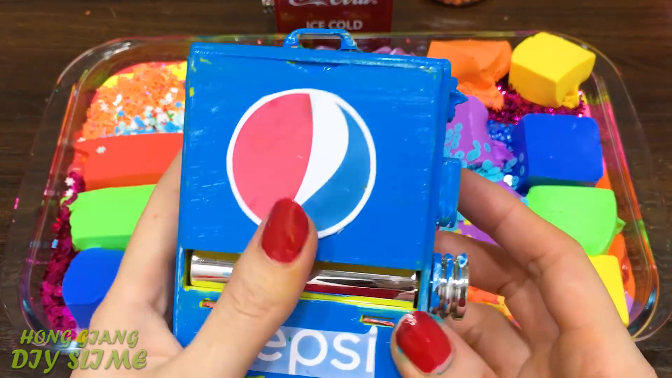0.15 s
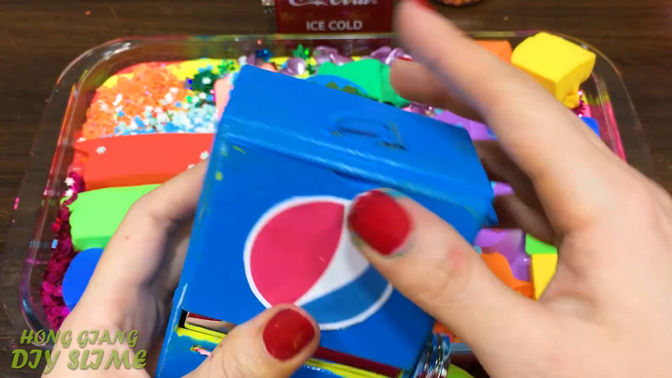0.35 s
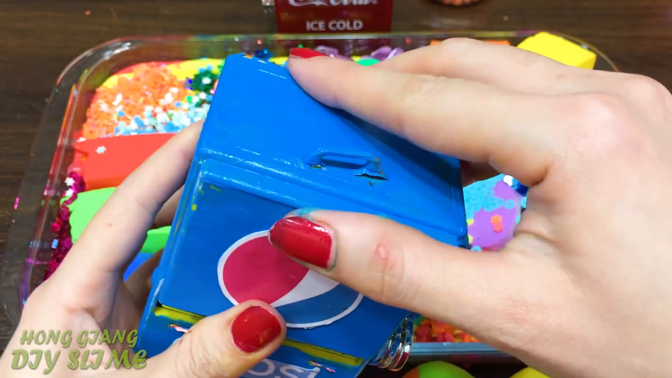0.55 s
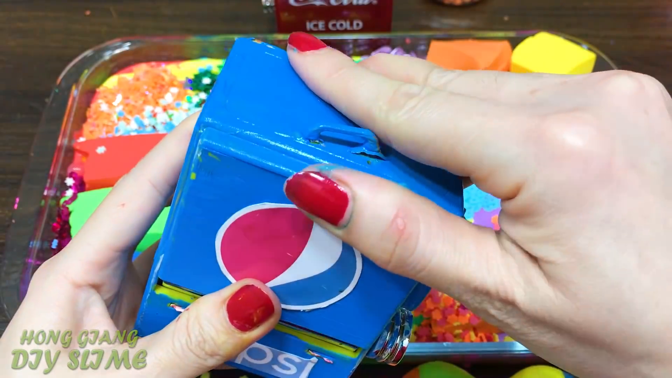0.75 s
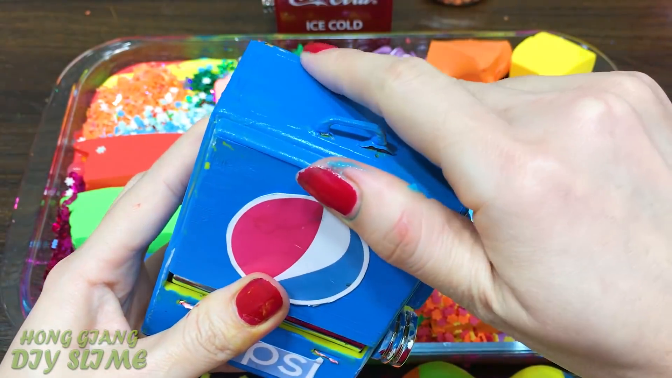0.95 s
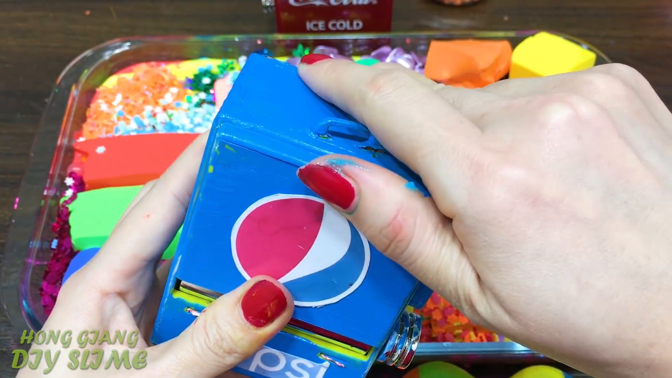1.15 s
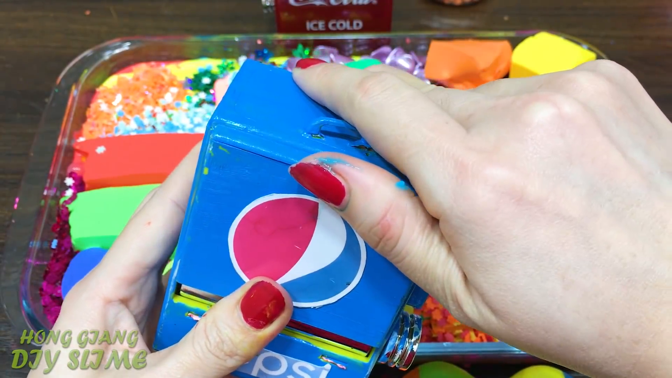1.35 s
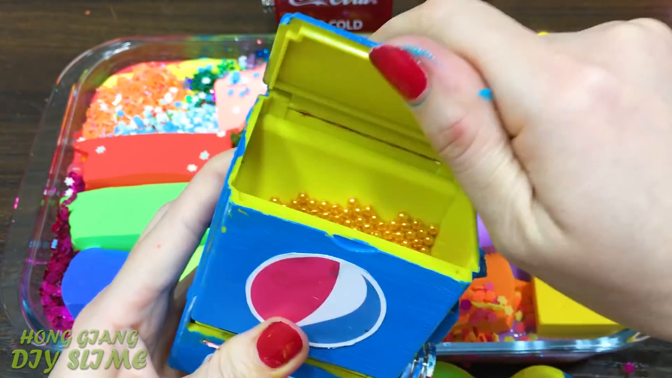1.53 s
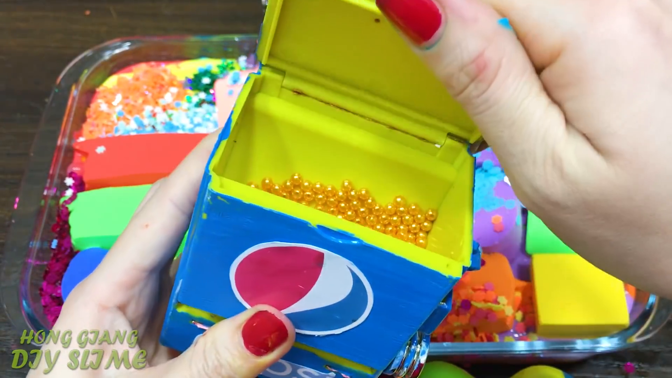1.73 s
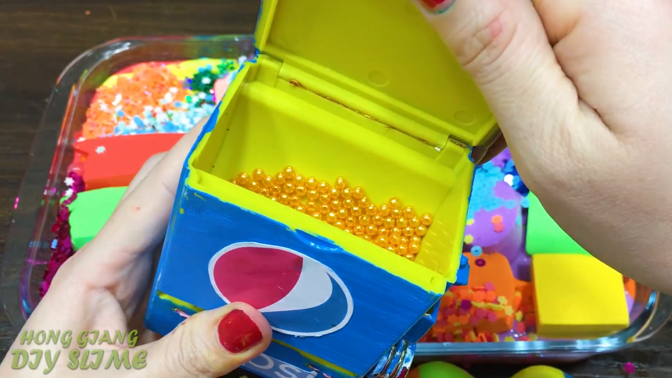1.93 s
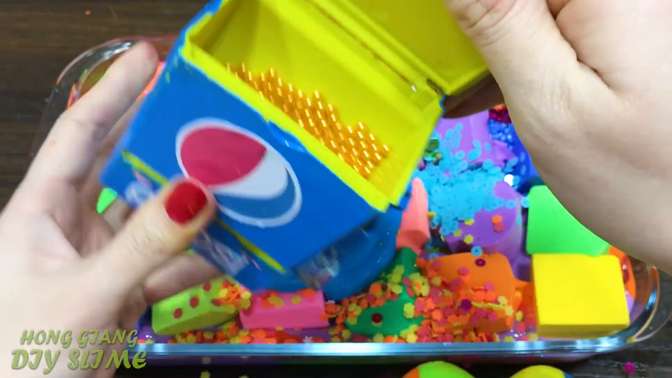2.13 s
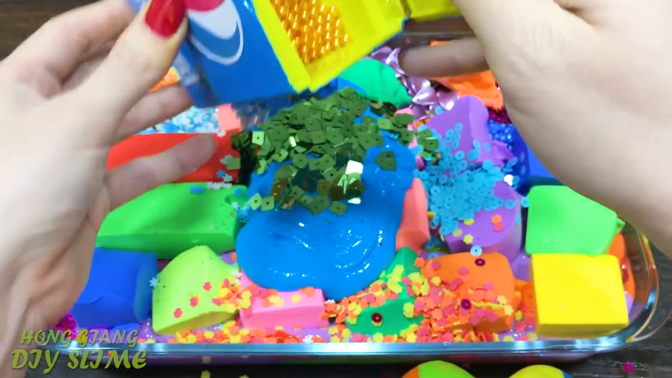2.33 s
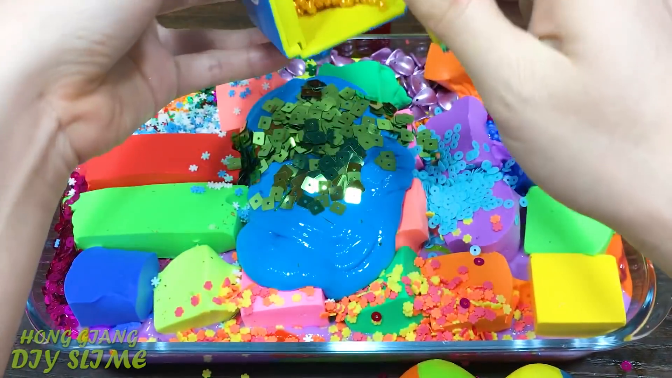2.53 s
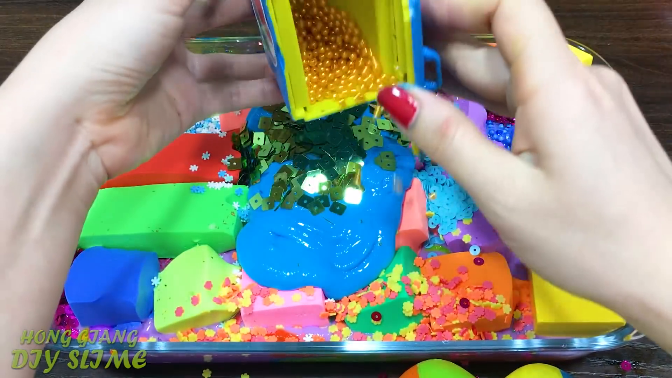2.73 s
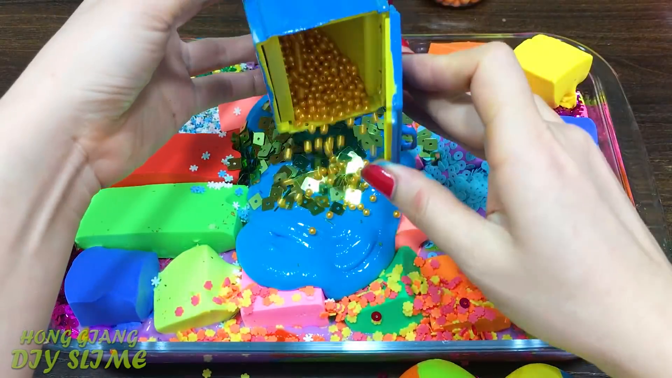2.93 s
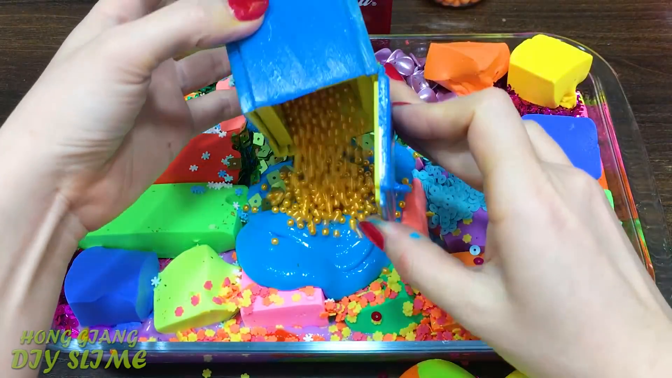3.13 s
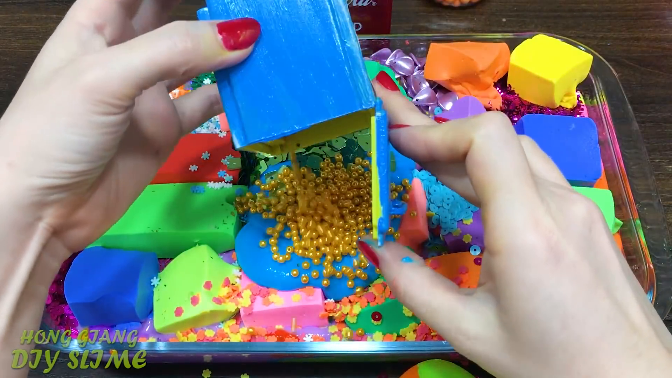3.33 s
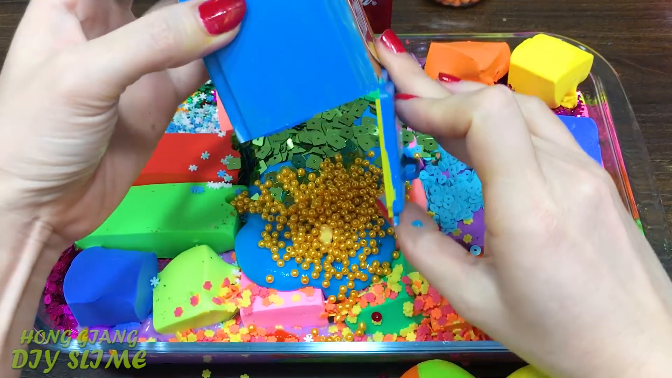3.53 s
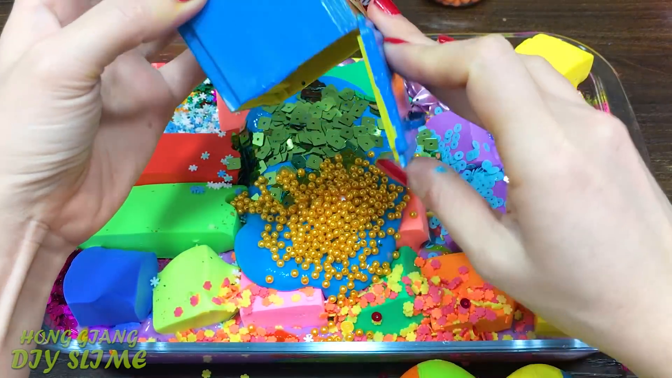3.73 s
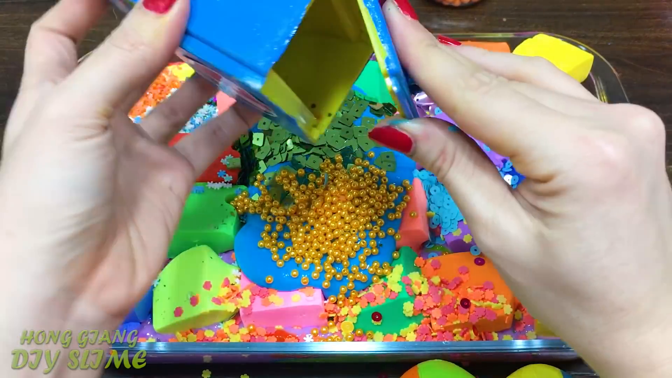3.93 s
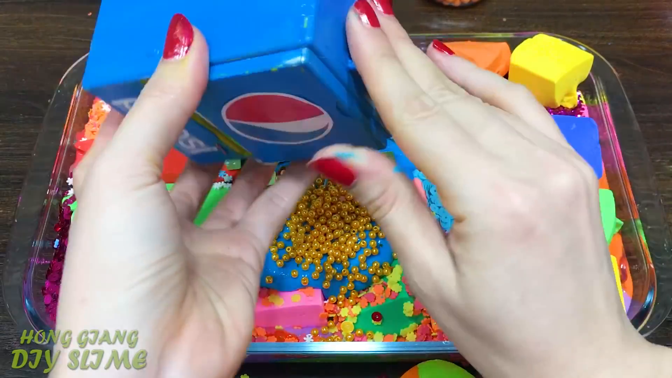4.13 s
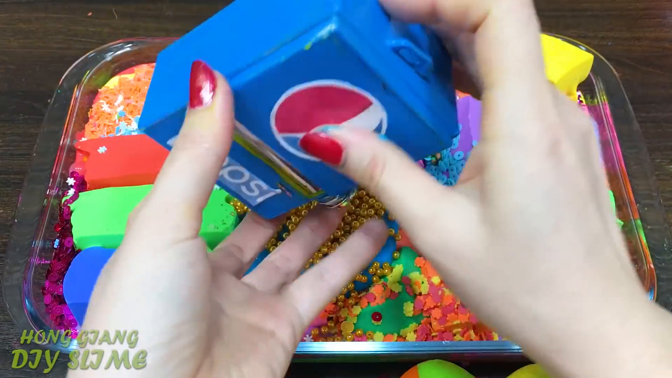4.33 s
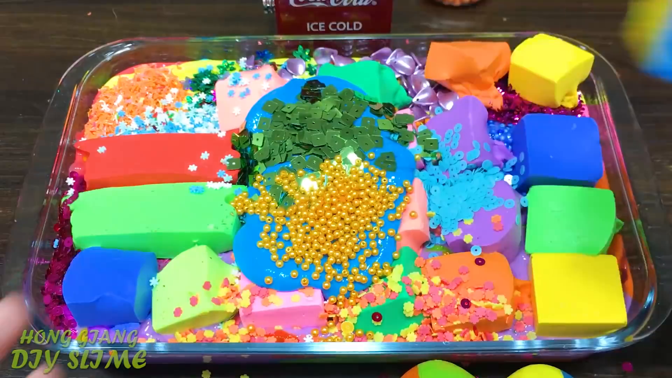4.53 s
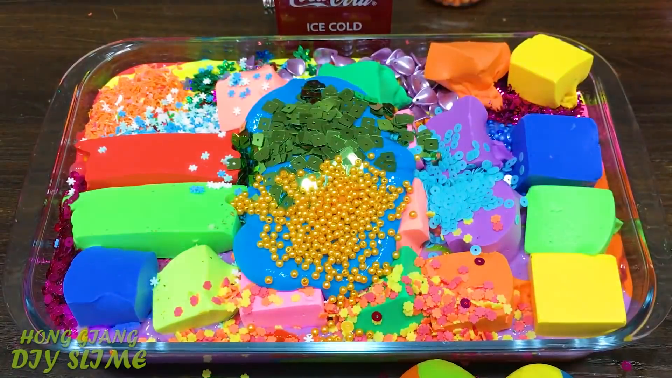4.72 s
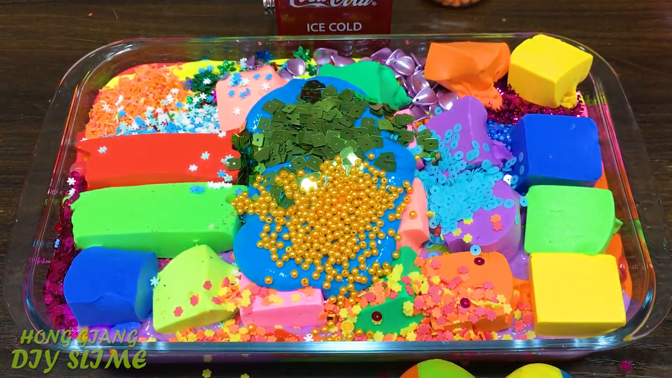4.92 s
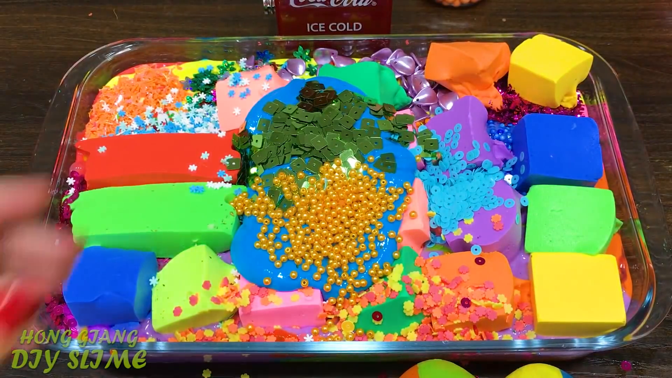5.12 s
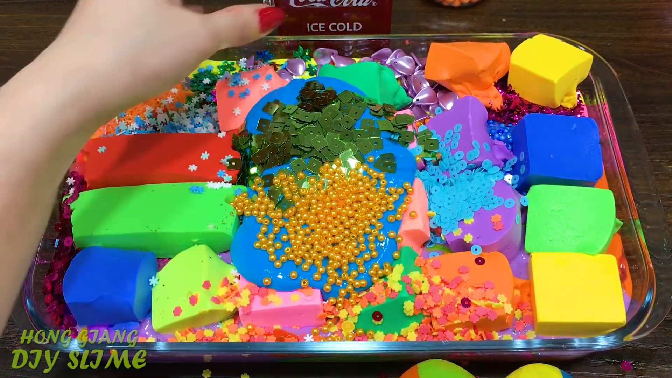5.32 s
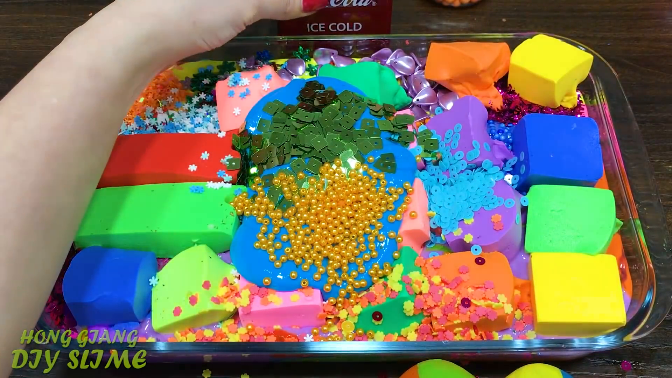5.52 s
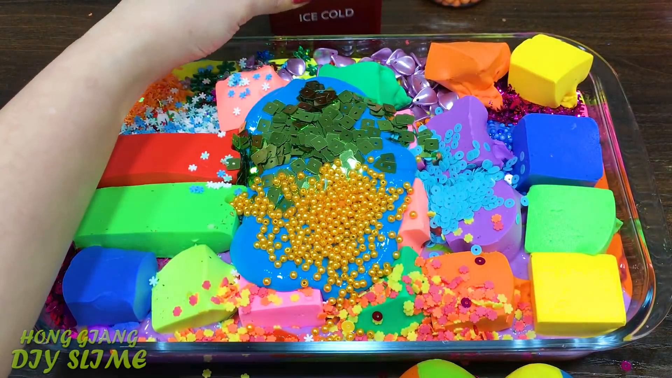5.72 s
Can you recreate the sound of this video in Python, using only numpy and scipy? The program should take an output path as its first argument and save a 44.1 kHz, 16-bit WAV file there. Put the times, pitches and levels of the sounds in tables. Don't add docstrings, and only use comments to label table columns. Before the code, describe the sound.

Beads rattle in a small plastic box, its hinge creaks, the lid pops open, beads pour out in a rush, and the lid snaps shut.

```python
import sys
import numpy as np
from scipy import signal
from scipy.fft import rfft, irfft, next_fast_len
from scipy.io import wavfile
from scipy.ndimage import uniform_filter1d

SR = 44100
rng = np.random.default_rng(int(sys.argv[2]) if len(sys.argv) > 2 else 0)


def dump_mix(stems):
    frames = np.atleast_2d(stems).T
    limited = np.clip(frames, -1, 1)
    pcm = np.round(limited * 32767).astype(np.int16)
    wavfile.write(sys.argv[1], SR, pcm)


def natural_amplitude(level_db):
    exponent = np.asarray(level_db, float) / 20
    return 10 ** exponent


N = 258867


def evened(x):
    return x / np.sqrt(np.mean(x ** 2) + 1e-20)


def peak_one(x):
    return x / abs(x).max()


def read(points, hz):
    f, value = np.transpose(points)
    return np.interp(np.log(hz + 1), np.log(f + 1), value)


def add(mix, s, sound):
    part = mix[round(s * SR):][:len(sound)]
    part += sound[:len(part)]


def causal(points, size=1024):
    hz = abs(np.fft.fftfreq(4 * size, 1 / SR))
    log_gain = np.log(natural_amplitude(np.maximum(read(points, hz), -100)))
    return np.fft.ifft(np.exp(np.conj(signal.hilbert(log_gain)))).real[:size]


def band(x, lo_hz, hi_hz):
    edges = [lo_hz, min(hi_hz, .48 * SR)]
    return signal.sosfilt(signal.butter(2, edges, "band", fs=SR, output="sos"), x)


def ring(modes, size=900):
    hz, width, db = np.transpose(modes)[:, :, None]
    t = np.arange(size) / SR
    fading = np.exp(-np.pi * width * t)
    return natural_amplitude(db) * 2 * np.pi * width / SR * fading * np.sin(2 * np.pi * hz * t)


def tick(tick_ms, size=900):
    burst = rng.standard_normal(size) * np.exp(-np.arange(size) / (tick_ms * SR / 1000))
    return burst / np.linalg.norm(burst)


def shifting(x, patchy_db):
    z = signal.stft(x, nperseg=256)[2]
    patches = uniform_filter1d(rng.standard_normal(z.shape), 4, 0)
    patches = uniform_filter1d(patches, 24, 1)
    return signal.istft(z * natural_amplitude(patchy_db * evened(patches)), nperseg=256)[1][:len(x)]


def beads(t, per_ms, walls, colour, ring_db, free, clump_db):
    spots, spread_db = 12, 2.5
    size = natural_amplitude(spread_db * np.minimum(rng.exponential(1, len(t)), 4))
    per_ms = np.clip(per_ms, .35, 12)
    size *= rng.random(len(t)) < per_ms * 1000 / SR
    spot = rng.integers(0, spots, len(t))
    out = np.zeros(len(t))
    for k in range(spots):
        local = np.multiply(walls, 1 + rng.standard_normal((len(walls), 1)) * [.012, 0, 0])
        share = rng.uniform(0.29, 1.9, len(walls)) * rng.choice([-1, 1], len(walls))
        hits = size * (spot == k)
        out += signal.oaconvolve(hits, tick(0.89))[:len(t)]
        out += signal.oaconvolve(hits * free, natural_amplitude(ring_db) * share @ ring(local))[:len(t)]
    out = signal.oaconvolve(out / np.sqrt(per_ms), causal(colour))[:len(t)]
    clumps = evened(uniform_filter1d(rng.standard_normal(len(t)), 160))
    out = shifting(out * natural_amplitude(clump_db * clumps), 1.5)
    return out / np.sqrt(np.mean(band(out, 4000, 15000) ** 2))


def jolts(rows):
    s, db, rise, fall = np.transpose(rows)[:, :, None]
    t = np.arange(max((s - 2 * rise).min(), 0), (s + 2 * fall).max(), 1 / SR)
    before = np.maximum((s - t) / rise, 0) ** 1.35
    after = np.maximum((t - s) / fall, 0) ** 1.15
    levels = natural_amplitude(db - 19.5 * (before + after))
    return t, 10 * np.log10((levels ** 2).sum(0) + 1e-11)


# t/s, level/dB, rise/s, fall/s
SHAKE_JOLTS = [
    (0.0, -40, .01, 0.042),
    (0.06, -51, 0.018, 0.14),
    (0.2, -59, 0.044, 0.026),
    (0.29, -50, .002, 0.069),
    (0.342, -34.5, 0.027, 0.093),
    (0.512, -48.5, 0.0038, 0.02),
    (0.614, -57, 0.028, 0.083),
    (0.79, -61, 0.23, 0.037),
]
ROLL_JOLTS = [
    (1.0, -26.5, 0.061, .12),
    (1.17, -74, 0.048, 0.0275),
    (1.191, -40, 0.0024, 0.022),
    (1.32, -64, 0.0041, 0.0092),
    (1.51, -64, 0.06, .02),
    (1.64, -72.5, 0.2, .3),
    (1.806, -62, .012, 0.0047),
]
JUMP_JOLTS = [
    (2.027, -33.5, 0.0019, 0.042),
    (2.065, -20, .002, 0.086),
    (2.17, -53, 0.018, 0.089),
    (2.646, -42.5, 0.011, .03),
    (2.702, -50, 0.0056, 0.077),
]
SETTLE_JOLTS = [
    (4.689, -23, 0.0024, .075),
    (4.86, -51.5, 0.11, .06),
    (4.95, -54.5, 0.069, .13),
    (5.07, -56, 0.061, 0.0091),
]
DREGS_JOLTS = [
    (4.122, -44, 0.042, 0.066),
    (4.22, -53, 0.0044, 0.029),
    (4.27, -61, 0.13, 0.19),
    (4.336, -44, .003, 0.011),
    (4.47, -65.5, 0.16, 0.046),
]
# f/Hz, width/Hz, level/dB
UPRIGHT_WALLS = [(1420, 204, 6.5), (3640, 147, 2.5), (4900, 200, 2), (5930, 170, 2), (9100, 540, -11.5)]
TILTED_WALLS = [(1100, 170, -4.5), (1430, 110, 1.5), (2960, 260, -3), (3640, 50, -7), (4930, 270, 2.5),
                (7340, 500, -12.5), (8800, 280, -9.5)]
AJAR_WALLS = [(601.3, 850, -7), (1300, 120, -6), (2080, 110, -3), (5100, 210, -5), (7400, 300, -13.5),
              (8440, 100, -1.5)]
LOOSE_WALLS = [(2080, 120, 5), (3200, 280, -1), (4000, 170, 0), (4900, 280, -3), (7400, 400, -7.5)]
RECLOSED_WALLS = [(370.4, 67, 12), (603, 60, 12), (1300, 150, 10.5), (2660, 130, -3), (4140, 240, -6.5),
                  (7500, 330, -10)]
# f/Hz, level/dB
SHUT_COLOUR = [(300, -37), (1000, -22), (2200, -17.5), (4000, -10.5), (6000, -6.5), (9000, -1.5),
               (16000, -4.5)]
AJAR_COLOUR = [(200, -22.5), (600, -20), (1000, -24.5), (2000, -3.5), (4300, -6.5), (8700, -2.5),
               (16000, -4)]
LOOSE_COLOUR = [(300, -41), (1100, -20), (1600, -9.5), (2500, -7), (5700, -4.5), (9000, 0), (16000, -2.5)]


def rattle():
    out = np.zeros(N)
    for rows, walls, colour, ring_db in [(SHAKE_JOLTS, UPRIGHT_WALLS, SHUT_COLOUR, 11),
                                         (ROLL_JOLTS, TILTED_WALLS, SHUT_COLOUR, 12),
                                         (JUMP_JOLTS, AJAR_WALLS, AJAR_COLOUR, 7),
                                         (SETTLE_JOLTS, RECLOSED_WALLS, AJAR_COLOUR, 8),
                                         (DREGS_JOLTS, LOOSE_WALLS, LOOSE_COLOUR, 10.5)]:
        t, db = jolts(rows)
        per_ms = 7.0 * natural_amplitude(0.38 * (db + 30.0))
        free = natural_amplitude(0.25 * (db - db.max()))
        add(out, t[0], natural_amplitude(db) * beads(t, per_ms, walls, colour, ring_db, free, clump_db=2.0))
    return out


# f/Hz, fade/s
ROOM_FADE = [(150, 0.46), (500, 0.28), (2000, 0.086), (6000, 0.045), (15000, 0.027)]


def room(x):
    echoes = np.zeros(SR // 2)
    at = np.arange(200, SR // 2 - 20, 20)
    echoes[at + rng.integers(0, 20, len(at))] = rng.choice([-1., 1.], len(at))
    hz, t, z = signal.stft(echoes, SR, nperseg=256)
    tail = signal.istft(z * natural_amplitude(-60 * t / read(ROOM_FADE, hz)[:, None]), SR, nperseg=256)[1]
    return signal.fftconvolve(x, tail / np.linalg.norm(tail))[:N]


# f/Hz, level/dB
AIR_COLOUR = [(12, -75), (71, 2.5), (135, -16.5), (257, -14), (640, -23), (2500, -28), (14700, -34.5),
              (16400, -34.5)]
# t/s, half length/s, level/dB, f/Hz
VEHICLES = [
    (0.52, 0.54, -64, 135.5),
    (2.75, 0.48, -69, 196),
    (4.35, 0.58, -66, 130),
    (4.1, 0.41, -65.5, 76),
    (0.71, 0.13, -66, 67),
]


def air():
    size = next_fast_len(N)
    hz, t = np.fft.rfftfreq(size, 1 / SR), np.arange(N) / SR
    white = rfft(rng.standard_normal(size))
    coloured = white * natural_amplitude(read(AIR_COLOUR, hz))
    out = np.zeros(N)
    for lo_hz, hi_hz, db in [(230, SR, -66.5), (0, 110, -68.5), (110, 230, -69.5)]:
        out += natural_amplitude(db) * evened(irfft(coloured * (hz >= lo_hz) * (hz < hi_hz), size)[:N])
    for s, half, db, drone_hz in VEHICLES:
        narrow = np.exp(-((hz - drone_hz) / 17) ** 2)
        drone = evened(irfft(white * narrow, size)[:N])
        out += natural_amplitude(db) * np.exp(-((t - s) / half) ** 4) * np.roll(drone, N // 3)
    return out


# t/s, level/dB, f/Hz
BEAD_ON_BEAD = [(0.0441, -23, 8950), (0.0628, -22, 6460), (0.079, -27.5, 5870), (0.2019, -42, 7750),
                (0.338, -34.5, 8270), (0.3403, -20, 9500), (0.3939, -17.5, 12000), (0.432, -31, 11300),
                (0.4508, -24, 11480), (0.514, -32.5, 8900), (0.6275, -30.5, 9100), (1.2135, -18.5, 5870),
                (1.3146, -12.5, 7850), (1.4997, -37.5, 5800), (1.8032, -41, 5760), (1.8565, -27.5, 8170),
                (2.167, -23, 10500), (2.5734, -32, 8300), (2.6721, -25.5, 6470), (2.7025, -30, 6330),
                (3.9724, -28.5, 12600), (4.024, -36.5, 12660), (4.133, -39, 8970), (4.1973, -35.5, 9800),
                (5.079, -26, 12400), (5.0138, -32.5, 3470), (5.0457, -30.5, 12600), (5.0603, -25, 9500),
                (5.0848, -26.5, 3600), (5.7558, -39.5, 13100)]
BEAD_ON_WALL = [(0.1845, -41, 7900), (0.2886, -32, 6270), (1.1067, -17.5, 7150), (0.3202, -37, 4900),
                (0.5808, -39.5, 9700), (0.6144, -40, 8960), (0.7981, -39, 7600), (1.465, -43, 11300),
                (1.62, -44, 8900), (1.687, -49, 10000), (4.256, -45, 8900), (2.1997, -38.5, 6740),
                (2.6232, -29, 7690), (2.6453, -28.5, 8770), (2.7185, -33, 6360), (2.9236, -27.5, 6800),
                (2.9932, -24.5, 7300), (3.027, -23, 5100), (4.0994, -36, 4600), (4.1122, -37, 4000),
                (4.1757, -35, 7960), (4.2231, -33, 12100), (4.2894, -41.5, 12740), (4.4442, -37.5, 5300),
                (4.483, -45.5, 5100), (4.808, -27.5, 12220), (4.8565, -27, 10300), (4.879, -28, 8500),
                (3.939, -20.5, 12250), (3.896, -22, 6560), (3.917, -25, 5300), (3.955, -31, 3200)]
NAIL_ON_WALL = [(0.749, -41, 5250), (1.1487, -27, 5750), (1.155, -36, 8850), (1.1935, -27.5, 5400),
                (1.423, -44, 5100), (1.481, -39.5, 11300), (1.5443, -42, 8300), (1.651, -45, 8100),
                (1.7155, -40.5, 7950), (1.752, -40, 8440), (2.647, -31, 10800), (2.872, -49.5, 5640),
                (2.9639, -24, 7500), (4.0428, -40.5, 4960), (4.0535, -40, 5100), (4.1064, -38.5, 5270),
                (4.3359, -34.5, 5960), (4.9255, -45, 12420), (4.9379, -34, 7500), (4.9432, -35, 4800),
                (4.9627, -34, 9600), (4.994, -39, 6900)]
# t/s, level/dB, f/Hz
HEAVY_BEADS = [(2.9344, -35.5, 6240), (2.9406, -29.5, 10960), (2.9744, -26, 7300), (3.0424, -30, 7730),
               (3.0579, -18, 8410), (3.0972, -16, 12800), (3.1313, -15, 12200), (3.1462, -9, 12800),
               (3.1584, -13, 12800), (3.1805, -10, 8160), (3.2258, -11, 8490), (3.2334, -14, 8540),
               (3.253, -15, 8930), (3.258, -13, 8460), (3.3167, -7, 12800), (3.4371, -12, 4020),
               (3.466, -17, 8480), (3.479, -13.5, 4150), (3.5129, -19, 11200), (3.5364, -21, 11000),
               (3.5794, -17, 10900), (3.624, -16, 11100), (3.645, -10, 11200), (3.658, -13, 10800),
               (3.734, -14, 11600), (3.7524, -17, 11800), (3.7887, -22, 10800), (3.866, -17, 10700)]
# t/s, level/dB, f/Hz
ROLLING_BEADS = [(0.8214, -55, 8290), (0.8344, -46, 7630), (0.8494, -50, 7890), (0.8659, -47, 9320),
                 (0.8959, -45, 4210), (0.9173, -43, 9030), (0.9313, -30, 8840), (0.9593, -20, 9560),
                 (0.9852, -15, 9550), (1.0056, -18, 5000), (1.176, -32, 5720)]


def ticks():
    out = np.zeros(N)
    for rows, body_db, tick_ms in [(BEAD_ON_BEAD, -25, 1.3), (BEAD_ON_WALL, -11, 1.3), (NAIL_ON_WALL, -1, 1.3),
                                   (HEAVY_BEADS, -17, 0.6), (ROLLING_BEADS, -17, 1.3)]:
        for s, db, hz in rows:
            contact = tick(tick_ms)
            pitched = peak_one(band(contact, 0.947 * hz, 1.137 * hz))
            bright = peak_one(pitched + 2.0 * peak_one(band(contact, 4500, 16000)))
            body = natural_amplitude(body_db) * peak_one(band(contact, 1200, 3370))
            add(out, s + 0.001097, natural_amplitude(db - 4.0) * (bright + body))
    return out


# t/s, level/dB, f/Hz
GRIP_SHIFTS = [
    (0.8, -53, 100),
    (2.643, -47, 130),
    (4.315, -53, 268),
    (3.7, -56, 145),
    (0.51, -53, 120),
]


def thumps():
    out = np.zeros(N)
    for s, db, hz in GRIP_SHIFTS:
        cycles = np.arange(-1.5, 1.5, hz / SR)
        add(out, s - 1.5 / hz, natural_amplitude(db) * np.exp(-cycles ** 2) * np.sin(2 * np.pi * cycles))
    return out


# t/s, level/dB, f/Hz
FINGER_TAPS = [(0.727, -47, 1530), (0.7458, -42, 1370), (2.4454, -38, 2320), (2.4552, -33.5, 2260),
               (3.4419, -18.5, 1420), (4.052, -48, 1990), (4.1244, -39.5, 2030), (4.19, -45, 2050),
               (4.222, -54, 2080), (4.256, -48.5, 2100), (1.59, -50, 2600), (1.688, -50, 2550),
               (1.465, -52, 2600), (1.482, -50, 2600), (1.62, -42, 2550)]


def taps():
    out, t = np.zeros(N), np.arange(600) / SR
    for s, db, hz in FINGER_TAPS:
        overtone = np.sin(2 * np.pi * 1.97 * hz * t)
        tone = np.sin(2 * np.pi * hz * t) + 0.078 * overtone
        add(out, s, natural_amplitude(db - 7.0) * peak_one(t * np.exp(-t * hz / 1.4) * tone))
    return out


# t/s, level/dB, edge level relative to it/dB
HINGE_SLIPS = [(1.148, -21, -8.5), (1.185, -26, -11), (1.197, -32, -8), (1.214, -24, -1),
               (1.301, -31.5, -12), (1.312, -30, -5), (1.327, -27.5, -5), (1.444, -29, -13),
               (1.498, -43, -3), (1.513, -49, -8), (1.542, -47, -8), (1.574, -25, -7.5),
               (1.604, -27.5, -11), (1.668, -23.5, -8), (1.69, -42, -8), (1.716, -44, -2),
               (1.725, -24.5, -8), (1.751, -47, -6), (1.841, -24, -6.5), (1.924, -27, -10.5),
               (1.968, -29, -14)]
# t/s, level/dB, edge level relative to it/dB
FAINT_SLIPS = [
    (1.66, -47, -11),
    (1.559, -47, -10),
    (1.567, -48, -2),
    (1.425, -50, -6),
    (2.004, -25, -10),
    (4.94, -32, -5.5),
]
# f/Hz, width/Hz, level/dB
LID_MODES = [(543, 270, -3), (1200, 600, -1), (1400, 660, -2.5)]
EDGE_MODES = [(2550, 580, 1.5), (3120, 1300, 2), (4900, 1100, -3.5)]


def hinge():
    out = np.zeros(N)
    for s, db, edge_db in HINGE_SLIPS + FAINT_SLIPS:
        gripped = ring(np.multiply(LID_MODES, [rng.uniform(1.0, 1.05), 1, 1]), size=500)
        low = sum(sign * np.convolve(mode, mode) for sign, mode in zip([-1, 1, -1], gripped))
        shares = rng.uniform(.4, 1.6, len(EDGE_MODES))
        edge = sum(k * np.convolve(mode, mode) for k, mode in zip(shares, ring(EDGE_MODES, size=300)))
        add(out, s + 0.0015, natural_amplitude(db + 0.45) * peak_one(low))
        add(out, s + 0.0014, -natural_amplitude(db + edge_db - 1.5) * peak_one(edge))
    return out


# t/s, level/dB, length/ms, treble level/dB
LID_BLOWS = [
    (2.0206, -6, 5, -2),
    (2.0593, -0.5, 4.1, -6.5),
    (2.0757, -11, 3.3, -2.5),
    (4.6644, -34, 1.5, -4),
    (4.6738, -24, 7, -12),
    (4.6821, 0.5, 6.1, -5),
]
# f/Hz, width/Hz, level/dB
POP_MODES = [(335, 180, -10.5), (514, 220, -3), (740, 94, -7), (600, 42, -5), (1336, 140, 3),
             (1606, 200, -4.5), (2089, 120, -1.5), (2580, 200, -1.5), (2880, 220, -4), (3600, 200, -10),
             (3950, 180, -8.5), (5000, 500, -16)]
SNAP_MODES = [(119, 20, -10.5), (252, 31, -3), (356.7, 35, 0), (503, 160, 3), (604, 22, 8.5), (778, 51, -2),
              (1370, 200, 1), (1706, 230, -3.5), (2610, 170, -4), (2946, 170, -5), (3460, 170, -3),
              (4450, 250, -10), (357, 10, -3), (7690, 350, -5)]


def blows():
    out, t = np.zeros(N), np.arange(9000) / SR
    for s, db, length_ms, treble_db in LID_BLOWS:
        opening = s < 3
        age = t * 1000 / length_ms
        chatter = rng.standard_normal(len(t)) * np.exp(-age ** 7.5 - 1.2 * age) * np.minimum(t / 0.00034, 1)
        table = np.array(POP_MODES if opening else SNAP_MODES)
        modes = (-1.) ** np.arange(len(table))[:, None] * ring(table, size=len(t))
        low, high = modes[table[:, 0] < 1000], modes[table[:, 0] >= 1000]
        shaken = signal.fftconvolve(chatter[None], high, axes=1)[:, :len(t)]
        high_part = (np.linalg.norm(high, axis=1) / np.linalg.norm(shaken, axis=1)) @ shaken
        body = high_part + np.pad(low.sum(0), (8, 0))[:len(t)]
        body = peak_one(band(body, 240 if opening else 85, 20000))
        crack = natural_amplitude(treble_db) * peak_one(band(chatter, 4100, 13000))
        add(out, s, natural_amplitude(db) * peak_one(body + crack))
    return out


def brush():
    out = np.zeros(N)
    puff = band(rng.standard_normal(900), 155, 4300) * signal.windows.hann(900)
    add(out, 2.636, natural_amplitude(-42.5) * peak_one(puff))
    return out


# t/s, level/dB
POUR_FLOW = [
    (2.92, -52.5),
    (3.016, -45),
    (3.12, -30.5),
    (3.262, -24.5),
    (3.378, -30),
    (3.82, -30),
    (3.9, -40.5),
    (3.99, -55),
    (4.06, -63),
]
# f/Hz, width/Hz, level/dB
FULL_WALLS = [(1388, 157, -3), (1940, 310, -7), (4060, 220, -7), (7810, 220, -11), (10300, 250, -10),
              (12800, 730, -9)]
BARE_WALLS = [(2030, 88, 8), (2125, 59, 10), (4020, 320, -3), (4800, 130, -4), (6710, 170, -6),
              (9030, 340, -10.5), (10800, 240, -6), (11600, 250, -7)]
# f/Hz, level/dB
OPEN_COLOUR = [(300, -41), (700, -28.5), (1100, -24), (1500, -16), (2500, -7.5), (5700, -5.5), (9000, -1),
               (16000, -3)]


def pour():
    out = np.zeros(N)
    s, level = np.transpose(POUR_FLOW)
    t = np.arange(s[0], s[-1], 1 / SR)
    db = np.interp(t, s, level)
    per_ms = 7.8 * natural_amplitude(0.63 * (db + 28.5))
    free = natural_amplitude(0.9 * np.minimum(db + 40.0, 0))
    full = beads(t, per_ms, FULL_WALLS, OPEN_COLOUR, 13.0, free, clump_db=1.56)
    bare = beads(t, per_ms, BARE_WALLS, OPEN_COLOUR, 13.0, free, clump_db=1.64)
    emptying = (t - 3.29) / 0.65
    uncovered = (3.19 - t) / 0.33
    bareness = np.maximum(np.maximum(emptying, uncovered), 0.15)
    turn = np.clip(bareness, 0, 1) * np.pi / 2
    rush = natural_amplitude(4) * np.exp(-((t - 3.25) / 0.1) ** 4) * band(full, .96 * 8490, 1.04 * 8490)
    add(out, t[0], natural_amplitude(db) * (np.cos(turn) * full + np.sin(turn) * bare + rush))
    return out


# t/s, level/dB, f/Hz, width/Hz
KNUCKLE_KNOCKS = [
    (3.441, -24.5, 2800, 150),
    (4.336, -46, 1872, 45),
    (4.336, -47, 1380, 91),
    (4.893, -46, 1300, 90),
    (4.939, -35.5, 1330, 50),
    (4.962, -42.5, 1300, 70),
    (4.994, -44, 1320, 90),
]


def knocks():
    out, t = np.zeros(N), np.arange(3000) / SR
    for s, db, hz, width in KNUCKLE_KNOCKS:
        wall = ring([(hz, width, 0)], size=len(t))[0]
        add(out, s, natural_amplitude(db) * peak_one(wall * np.minimum(t / 0.0016, 1)))
    return out


def scene():
    box = rattle() + ticks() + thumps() + taps() + hinge() + blows() + brush() + pour() + knocks()
    box = band(box, 37, 21000)
    return (box + natural_amplitude(-22.0) * room(box) + air())[None]


def top_cut(x):
    return signal.sosfilt(signal.butter(12, 16550, fs=SR, output="sos"), x)


def record(dry):
    edge = signal.firwin(255, 16050, window=("kaiser", 7), fs=SR)
    mix = np.clip(signal.oaconvolve(dry, edge[None], "same"), -1, 1)
    return top_cut(mix)


dry = scene()
out = record(dry)
dump_mix(out)
```